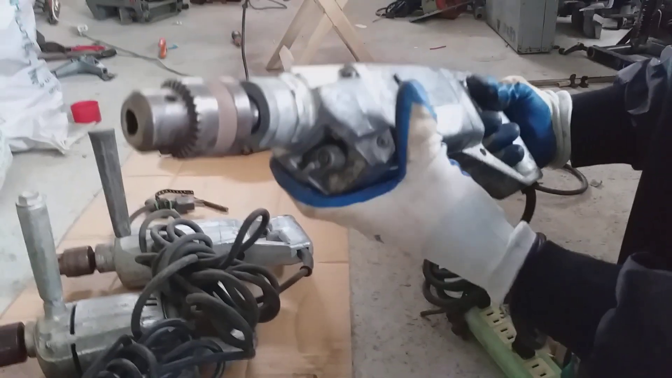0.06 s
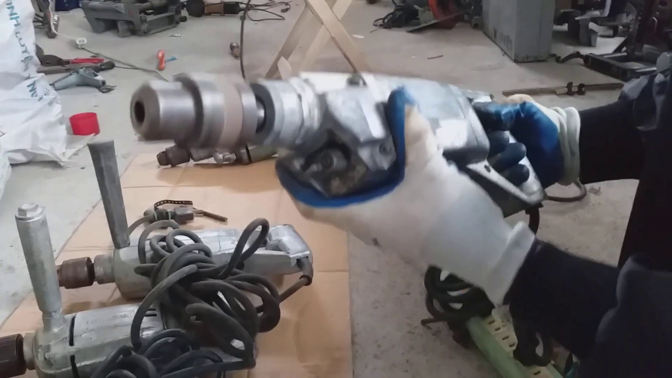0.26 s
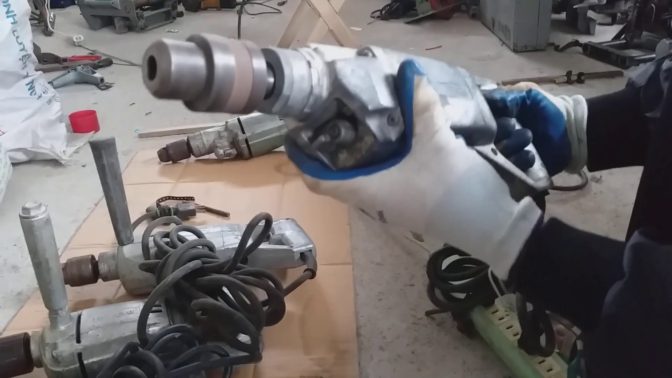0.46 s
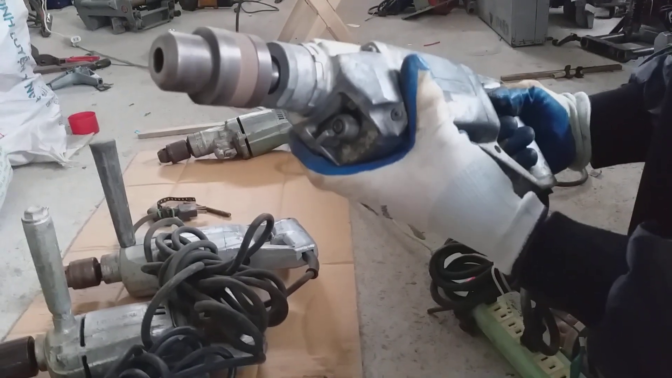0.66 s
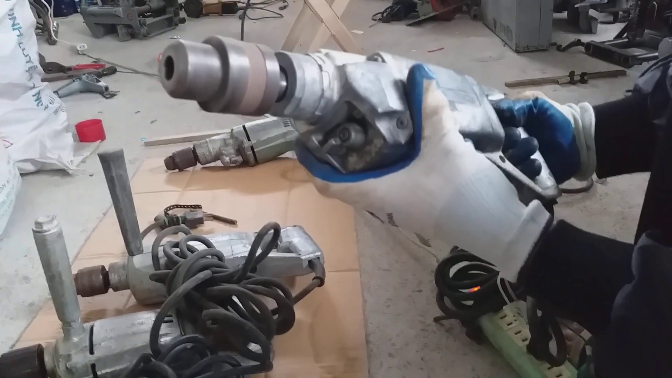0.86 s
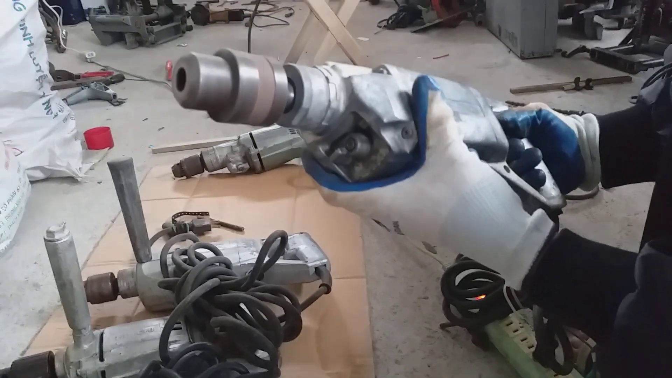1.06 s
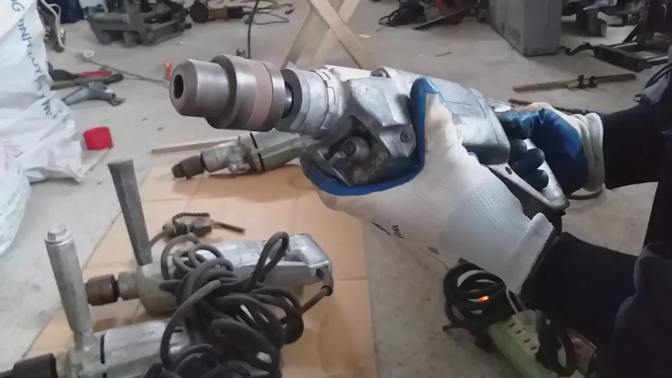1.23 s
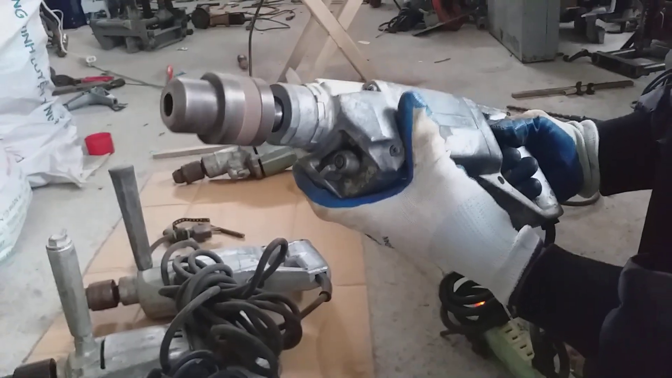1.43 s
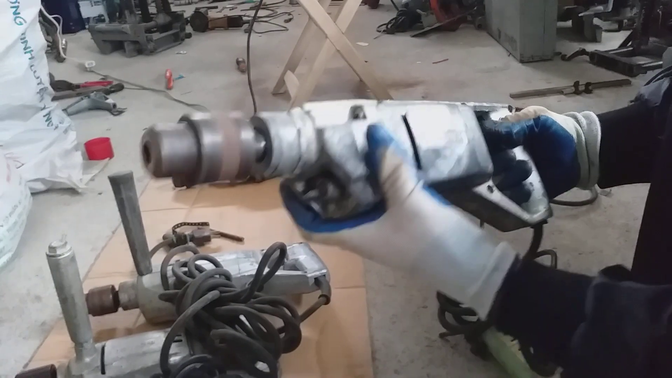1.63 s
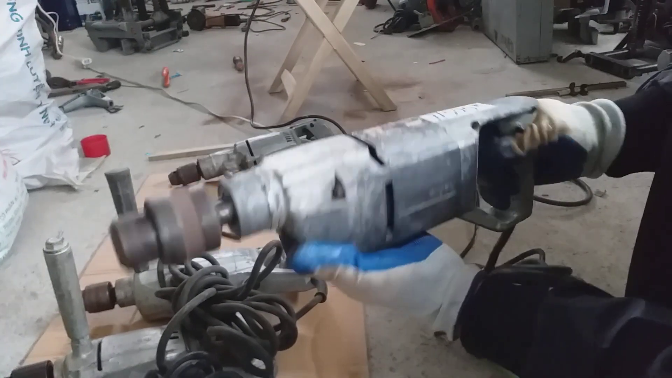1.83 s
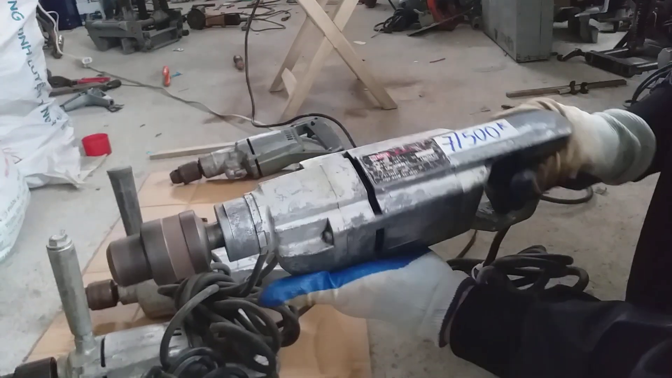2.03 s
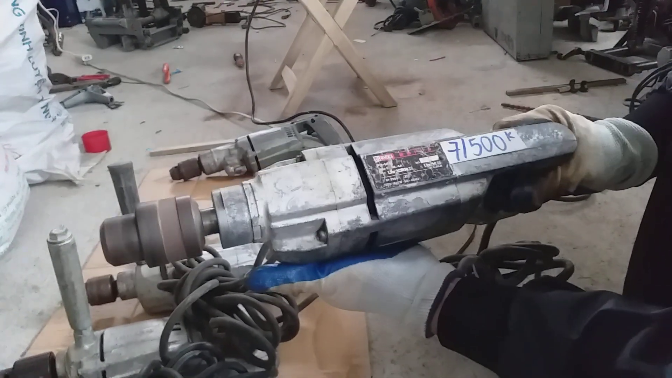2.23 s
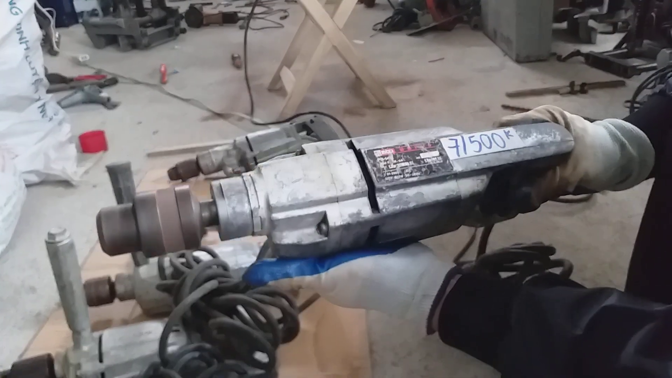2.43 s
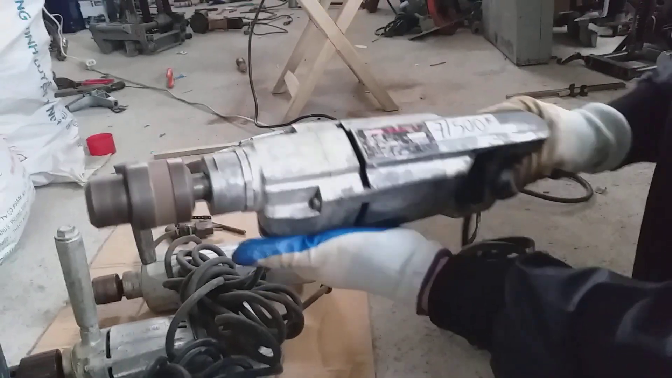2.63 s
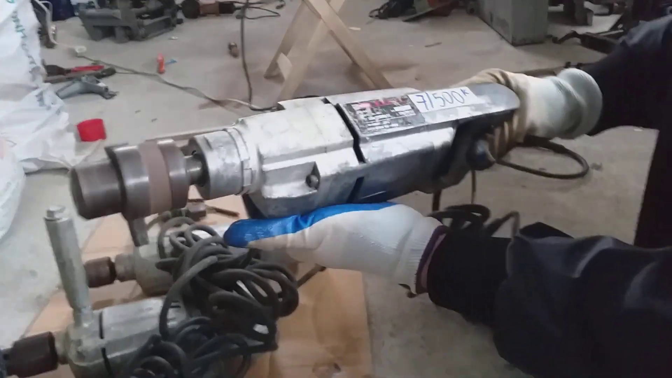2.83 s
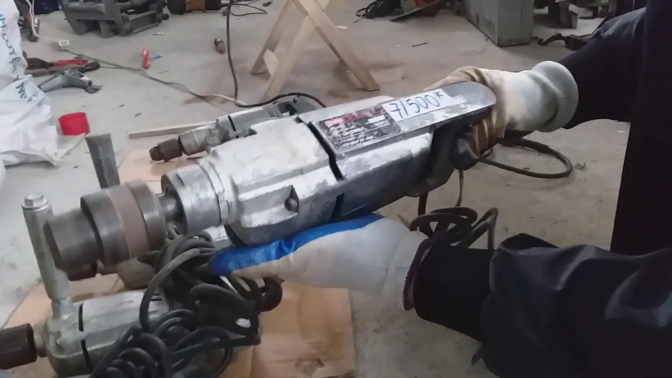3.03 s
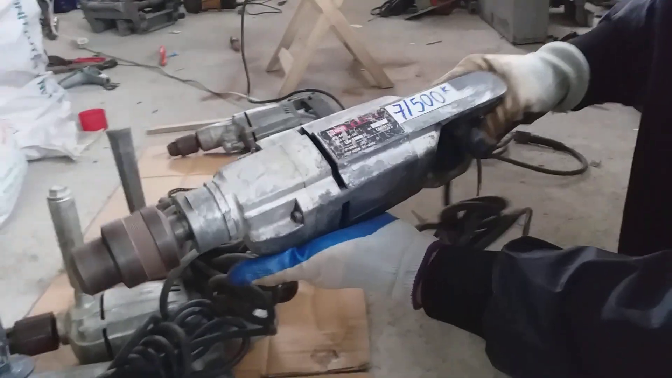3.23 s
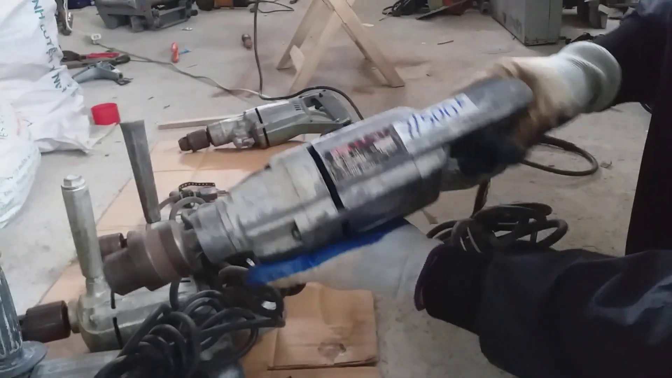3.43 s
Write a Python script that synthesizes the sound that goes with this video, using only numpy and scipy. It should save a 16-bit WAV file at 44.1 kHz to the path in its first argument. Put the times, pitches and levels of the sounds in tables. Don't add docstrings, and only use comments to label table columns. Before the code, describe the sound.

A handheld electric drill clicks, jerks and runs up fast to a high whine with rushing fan air, then is released and coasts down in pitch, close to a phone microphone in a small live workshop.

```python
import sys
import numpy as np
from scipy import signal
from scipy.fft import rfft, irfft, next_fast_len
from scipy.io import wavfile
from scipy.ndimage import uniform_filter1d, map_coordinates

SR = 44100
rng = np.random.default_rng(int(sys.argv[2]) if len(sys.argv) > 2 else 0)


def generate_wav(signal):
    frames = np.transpose(np.atleast_2d(signal))
    scaled = np.clip(frames, -1, 1) * 32767
    pcm = np.round(scaled).astype(np.int16)
    wavfile.write(sys.argv[1], SR, pcm)


def undo_db(level):
    steps = np.asarray(level, float) / 20
    return 10 ** steps


N = 154350
T = np.arange(N) / SR
ON_S, OFF_S = 0.21, 2.3826
TOP_RPS = 380.92
BLADES, MAINS_HZ = 12, 50


def unit(x):
    return x / np.sqrt(np.mean(x ** 2) + 1e-20)


def along(points, hz):
    f, v = np.transpose(points)
    return np.interp(np.log(hz + 1), np.log(f + 1), v)


def wobble(rate):
    return map_coordinates(rng.standard_normal(200), [T * rate], mode="wrap")


def filtered(x, response):
    m = next_fast_len(N + 8192)
    return irfft(rfft(x, m) * response(np.fft.rfftfreq(m, 1 / SR)), m)[..., :N]


def rush(colour_db, patchy_db):
    z = signal.stft(rng.standard_normal(N), nperseg=512)[2]
    field = uniform_filter1d(rng.standard_normal(z.shape), size=5, axis=0)
    field = uniform_filter1d(field, size=12, axis=1)
    x = signal.istft(z * undo_db(patchy_db * unit(field)), nperseg=512)[1][:N]
    return unit(filtered(x, lambda hz: undo_db(colour_db(hz))))


# (frequency [Hz], level [dB])
MICROPHONE = [(30, -16), (70, -1.5), (7300, 1), (7900, -3.5), (8600, -14), (9600, -14), (12000, -11),
              (15500, -14)]


def microphone_db(hz):
    return along(MICROPHONE, hz)


# (frequency [Hz], density [dB per Hz])
HISS = [(200, -7), (400, 2.5), (1000, 3), (2000, -9), (2700, 5), (3300, -3), (7500, -1.5), (9000, -5)]


def background():
    return undo_db(-52.5) * rush(lambda hz: along(HISS, hz), 1.1)


# (time [s], half length [s], level [dB])
GUSTS = [(0.025, 0.05, -44), (0.18, .03, -46), (0.274, .06, -44.5), (.5, 0.066, -43), (0.872, 0.022, -45),
         (.95, 0.028, -34.5), (1.045, 0.016, -39), (1.13, .04, -49), (1.353, 0.04, -42),
         (1.832, 0.071, -55), (2.75, .1, -62), (3.2, 0.13, -63)]
# (frequency [Hz], density [dB per Hz])
GUST_COLOUR = [(25, -25), (60, -3.5), (100, 0.5), (170, -4.5), (300, -18.5), (600, -33)]


def wind():
    shape = undo_db(-69)
    for s, half_s, db in GUSTS:
        shape = shape + undo_db(db) * np.exp(-.5 * ((T - s) / half_s) ** 2)
    return shape * unit(undo_db(2.8 * wobble(40)) * rush(lambda hz: along(GUST_COLOUR, hz), 1.5))


def room(x):
    t = np.arange(SR // 2) / SR
    t60_s = 0.21
    tail = rng.standard_normal(len(t)) * undo_db(-60 * t / t60_s) * (t > .004)
    return signal.fftconvolve(x, tail / np.linalg.norm(tail))[:N]


# (frequency [Hz], level [dB], decay T60 [s])
SWITCH = [(890, -19, 0.011), (1640, -24, .012), (3580, 2.5, 0.012), (6300, -6, 0.0089), (7570, -2, .006)]


def trigger():
    t = np.clip(T - 0.1976, 0, None)
    ring = sum(undo_db(db - 60 * t / t60) * np.sin(2 * np.pi * hz * t) for hz, db, t60 in SWITCH)
    decay = undo_db(-60 * t / 0.014) + undo_db(-15 - 60 * t / 0.11) * (t < .03)
    crack = 0.69 * decay * rng.standard_normal(N)
    return undo_db(-6) * (1 - np.exp(-t / 0.00059)) * (ring + crack)


# (share of top speed [ratio], time constant [s])
RUN_UP = [(.271, .0253), (.364, .1189), (.365, .3645)]


def shaft_speed():
    coast_s, coast_rest = 1.6873, .1725
    powered = np.clip(T - ON_S, 0, OFF_S - ON_S)
    up = 1 - sum(share * np.exp(-powered / s) for share, s in RUN_UP)
    return up * ((1 - coast_rest) * np.exp(-np.clip(T - OFF_S, 0, None) / coast_s) + coast_rest)


def shaft_angle(speed):
    return 2 * np.pi * np.cumsum(speed * TOP_RPS) / SR


def order(k, speed):
    return np.sqrt(2) * np.sin(k * shaft_angle(speed)) * (k * speed * TOP_RPS < SR / 2.2)


def motor_load(speed):
    return np.clip(1 - speed, 1e-3, 1) * (T < OFF_S)


def mains():
    return np.cos(2 * np.pi * MAINS_HZ * T + 0.53 / 2)


def throb():
    return np.abs(mains()) ** (2 * 1.1)


# (time [s], pose [0-2])
TURN = [(1.45, 0.15), (1.95, 0.93), (2.5, 1), (3.0, 1.7)]


def held_pose():
    return np.interp(T, *np.transpose(TURN))


# (time [s], blade octave level [dB], air level [dB])
FACING = [(.24, -37, -20), (.38, -36, -14.5), (.5, -11.5, -18), (.62, -31.5, -15.5), (.8, -33.5, -17),
          (1.2, -37, -18.5), (1.45, -39, -17.5), (1.7, -38, -18), (1.84, -38, -19), (2.05, -43, -18),
          (2.45, -39, -18), (2.7, -25.5, -21), (2.88, -29.5, -23.5), (3.2, -36, -24.5), (3.5, -46, -26.5)]


def facing():
    s, *columns = np.transpose(FACING)
    return [np.interp(T, s, c) for c in columns]


# (frequency [Hz], level [dB], start [s], end [s])
SQUEAL = [
    (3370, -18.5, .212, 0.26),
    (2580, -21, .212, 0.223),
    (12000, -24, .215, .245),
]


def squeal():
    total = 0
    for hz, db, a, b in SQUEAL:
        swell = np.sin(np.pi * np.clip((T - a) / (b - a), 0, 1)) ** 0.45
        total = total + undo_db(db) * swell * np.sin(2 * np.pi * hz * T)
    return total * (.5 + throb())


# (frequency [Hz], density [dB per Hz])
STRAIN = [(200, -21), (500, -3.5), (1000, 5.5), (1500, -3.5), (2500, -7), (5000, -21)]


def strain(load):
    return undo_db(-24.5 + 5.7 * wobble(24.05)) * load ** 0.57 * rush(lambda hz: along(STRAIN, hz), 0.52)


# (frequency [Hz], density [dB per Hz])
AIR = [(150, -25), (400, -15.5), (800, -6), (1500, -6.5), (3000, -4.5), (5000, 1), (8000, -3), (16000, -4)]
# (frequency [Hz], width [octaves], level [dB])
POSES = [
    [(950, 0.24, -0.5), (1640, 0.1, 5), (2450, 0.14, 7.5), (3940, .14, 6.5), (4540, 0.18, 0),
     (7110, 0.11, 4.5), (13000, 0.033, -2)],
    [(1290, 0.16, 6.5), (2020, 0.13, 4.5), (2590, .08, 2.5), (3800, 0.19, 2.5), (5380, 0.069, 5.5),
     (6970, 0.072, 3.5), (12200, 0.36, 5.5)],
    [(940, 0.094, 5), (1300, 0.18, 8), (2000, .2, -0.5), (2800, 0.15, 6), (5150, .1, 0.5), (6600, 0.23, -3),
     (11000, .15, 1)],
]


def air(speed, load, air_db):
    def bumps(hz, rows):
        return sum(db * np.exp(-.5 * (np.log2((hz + 1) / c) / w) ** 2) for c, w, db in rows)

    pose, total = held_pose(), 0
    for k, rows in enumerate(POSES):
        share = np.sqrt(np.clip(1 - abs(pose - k), 0, 1))
        total = total + share * rush(lambda hz: along(AIR, hz) + bumps(hz, rows), 0.6)
    stirred = 1 + .25 * load * (2 * throb() - 1) + 0.14 * np.cos(shaft_angle(speed))
    return total * undo_db(air_db + 5 + 0.65 * wobble(12)) * stirred


# (shaft order [per turn], level at stall [dB], power of load [exponent])
PULL = [
    (14, -7.5, 1.1),
    (28, -4, 2.4),
    (42, -24, .8),
    (56, -23, .5),
]
# (frequency [Hz], width [Hz], level [dB])
CASING = [(2870, 340, -4), (3230, 260, 1), (4130, 470, 4), (4900, 320, 5), (5750, 940, 1), (7400, 530, -11),
          (10800, 300, -1), (12100, 300, -5), (14200, 700, 2)]


def pull(load, speed):
    pulse = 1 + np.minimum(4.2 * load, 1) * (2 * throb() - 1)
    force = 0
    for k, db, power in PULL:
        grip = np.minimum(load, .5) ** power * pulse + undo_db(-35)
        force = force + undo_db(db + wobble(23)) * order(k, speed) * grip
    force *= 1 + 0.22 * mains()

    def casing(f):
        return sum((-1) ** k * undo_db(db) * 1j * f * w / (c * c - f * f + 1j * f * w)
                   for k, (c, w, db) in enumerate(CASING))

    return filtered(force, casing)


# (time [s], level [dB])
WHINE = [(.24, -40), (.29, -19.5), (.4, -23), (.52, -14.5), (.8, -11), (1.18, -8.5), (1.55, -15.5),
         (1.83, -6), (2.1, -14.5), (2.39, -17), (2.455, -36), (2.53, -18), (2.76, -18), (2.86, -26.5),
         (2.93, -25), (3.01, -34), (3.12, -21), (3.5, -28)]
# (shaft order [per turn], level [dB])
OVERTONES = [
    (36, -30),
    (48, -29),
    (56, -36),
    (60, -29),
]


def blades(speed, load, octave_db):
    turned = np.minimum(held_pose(), 1)
    tone_db = np.interp(T, *np.transpose(WHINE))
    whine = undo_db(tone_db + 1.2 * wobble(22.72)) * order(BLADES, speed)
    lift_db = -microphone_db(2 * BLADES * speed * TOP_RPS)
    octave = undo_db(octave_db + lift_db + wobble(15)) * order(2 * BLADES, speed)
    upper = 0
    for k, db in OVERTONES:
        fade_db = 6 * np.minimum(wobble(14), .6)
        upper = upper + undo_db(db + 6 * turned + fade_db) * order(k, speed)
    hum = undo_db(-46.5 - 3.5 * turned + 2.9 * wobble(7.1)) * order(1, speed)
    hum *= speed ** 2.6 * (1 + 10.5 * load)
    side = undo_db(-43 + 2 * wobble(6.4)) * order(BLADES + 1, speed) * speed
    return whine + octave + upper * speed ** 2.8 + hum + side


def drill():
    speed = shaft_speed()
    load = motor_load(speed)
    octave_db, air_db = facing()
    start = 1 - np.exp(-np.clip(T - ON_S, 0, None) / 0.015)
    running = blades(speed, load, octave_db) + pull(load, speed) + air(speed, load, air_db) + strain(load)
    return start * running + squeal()


def scene():
    near = drill() + trigger()
    mono = background() + wind() + undo_db(-15.5) * room(near) + near
    return np.array([mono, mono])


def band_limit(x):
    return signal.sosfilt(signal.butter(12, 16870, fs=SR, output="sos"), x)


def record(dry):
    ceiling, knee = 1.12, 3.5
    x = filtered(dry, lambda hz: undo_db(microphone_db(hz)))
    x = x / (1 + np.abs(x / ceiling) ** knee) ** (1 / knee)
    mix = filtered(x, lambda hz: hz < 15850)
    return band_limit(mix)


dry = scene()
out = record(dry)
generate_wav(out)
```